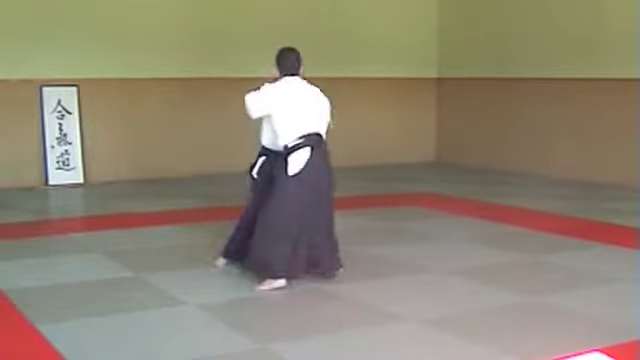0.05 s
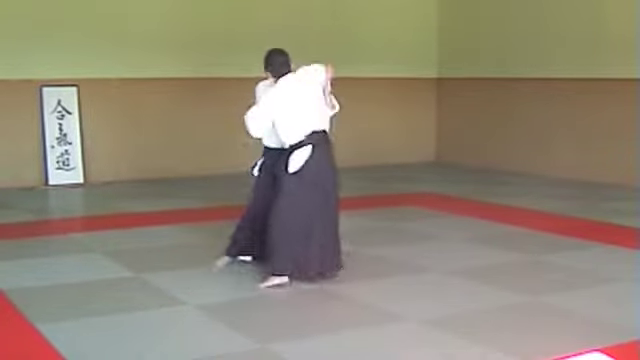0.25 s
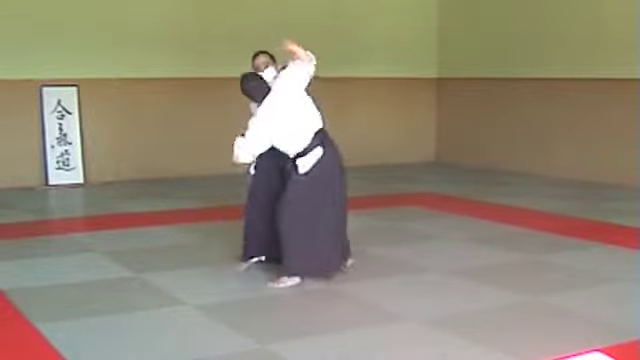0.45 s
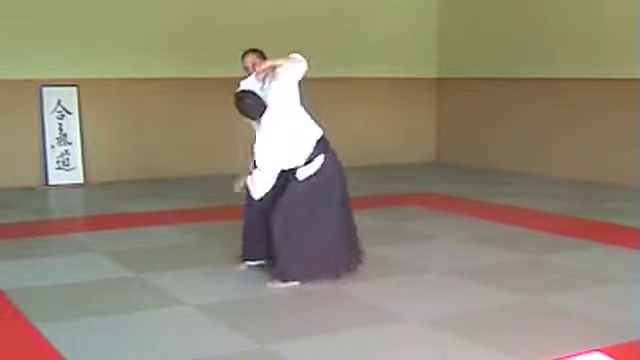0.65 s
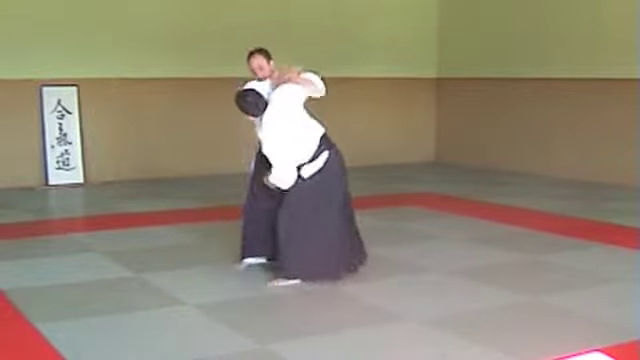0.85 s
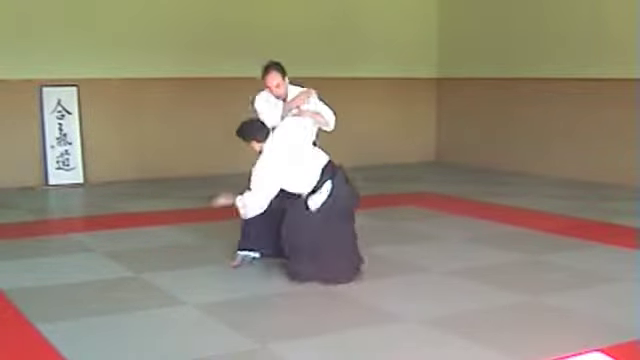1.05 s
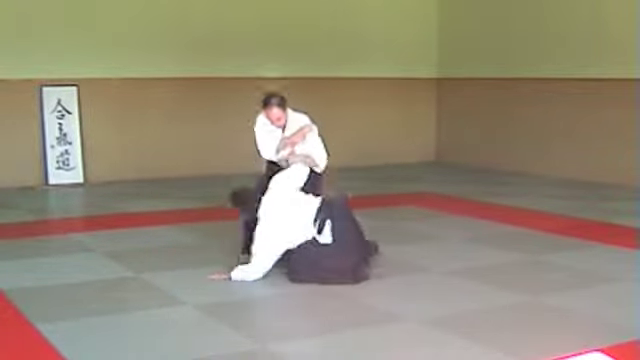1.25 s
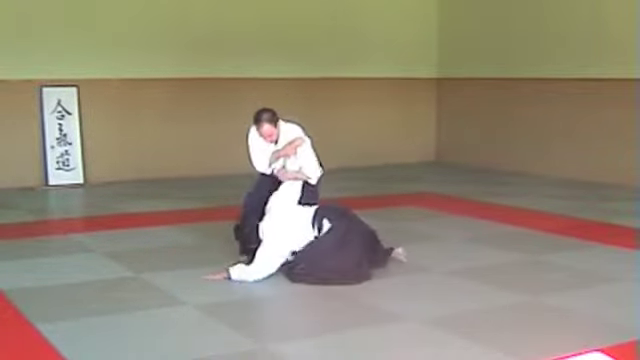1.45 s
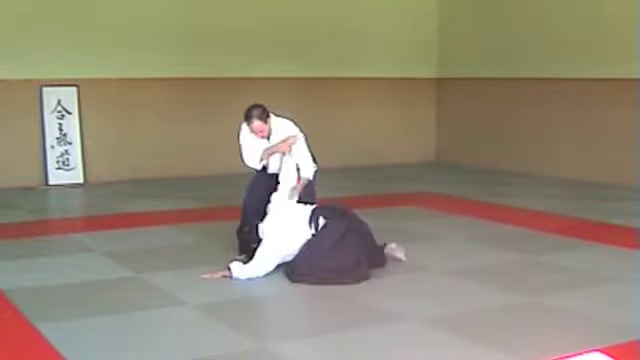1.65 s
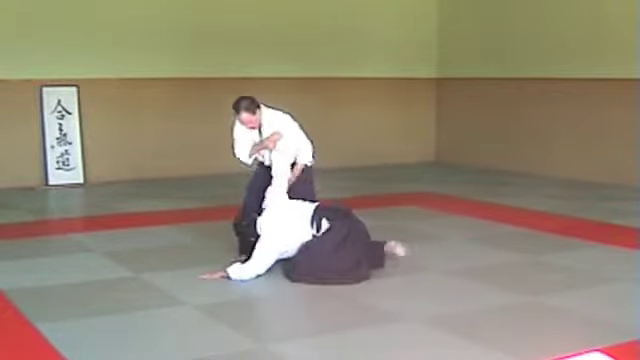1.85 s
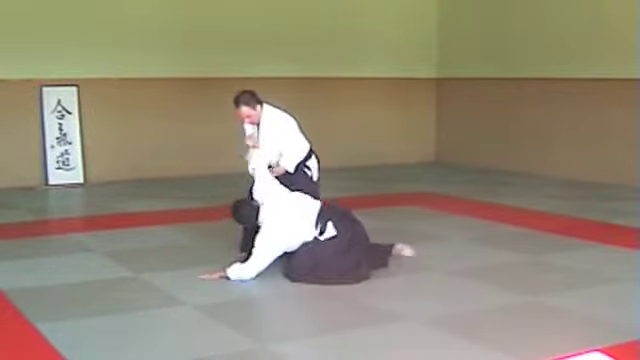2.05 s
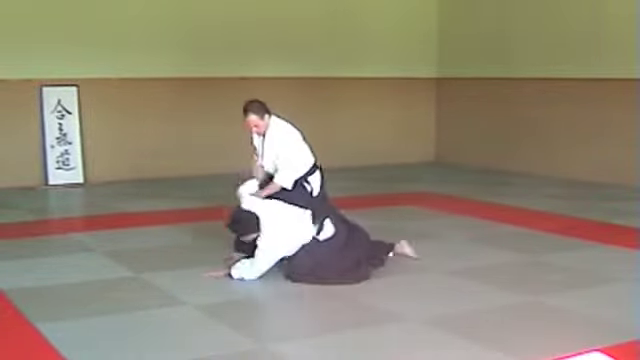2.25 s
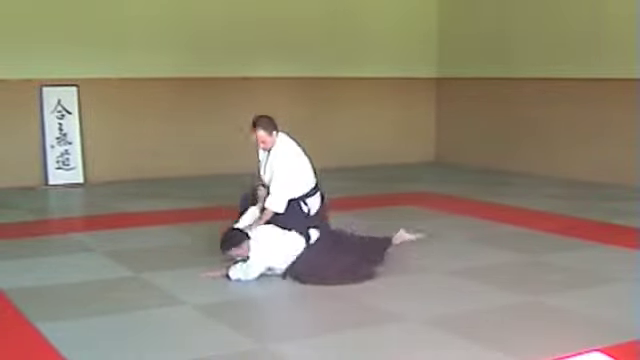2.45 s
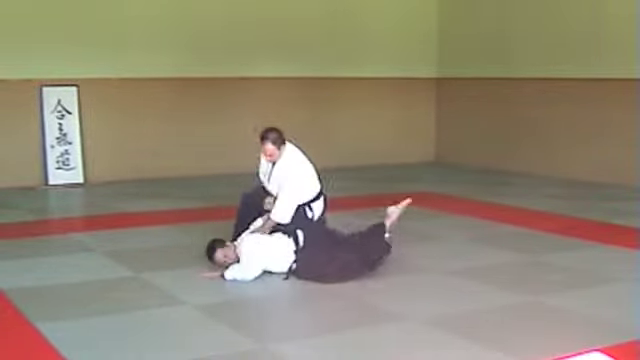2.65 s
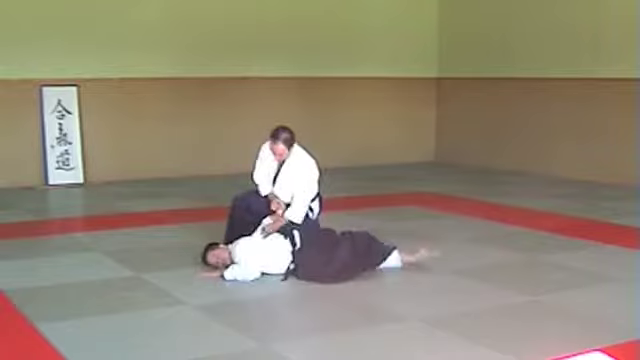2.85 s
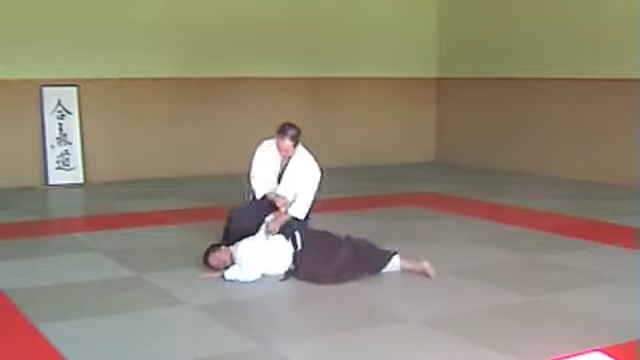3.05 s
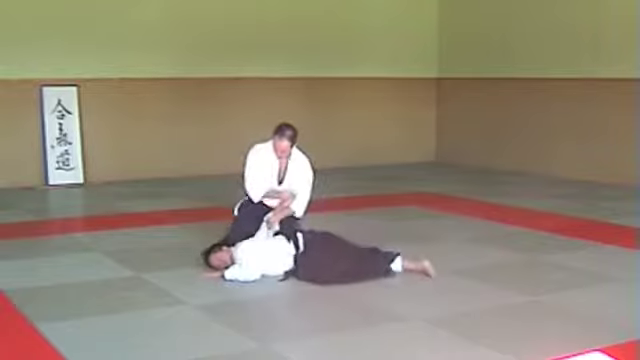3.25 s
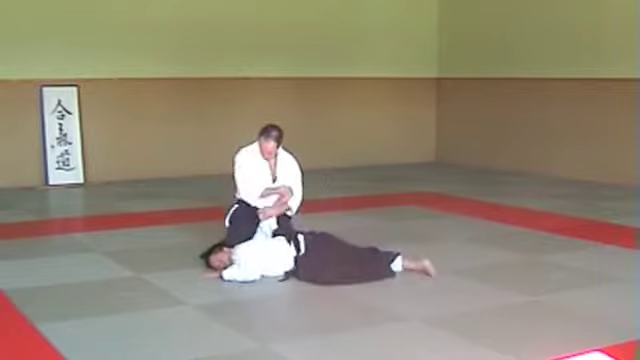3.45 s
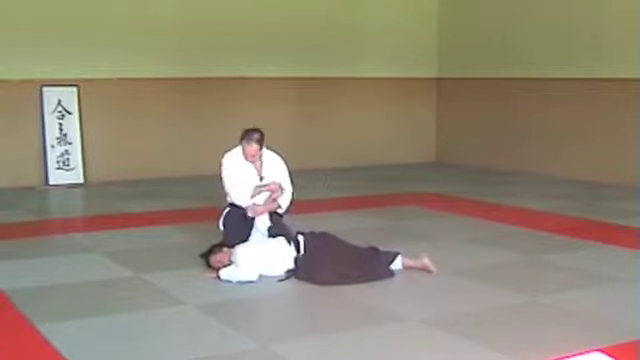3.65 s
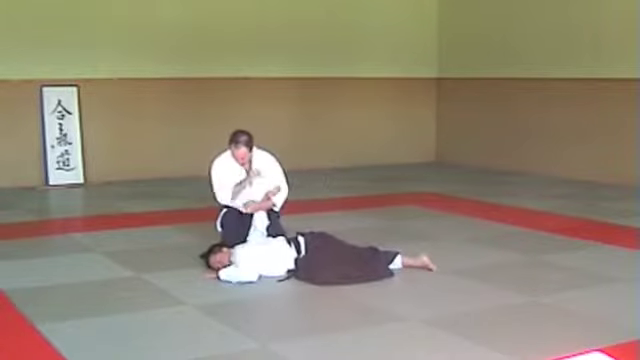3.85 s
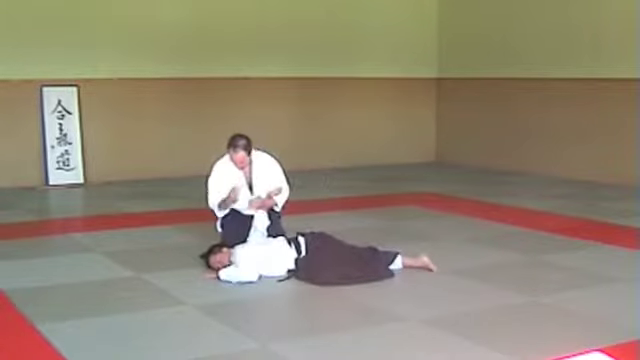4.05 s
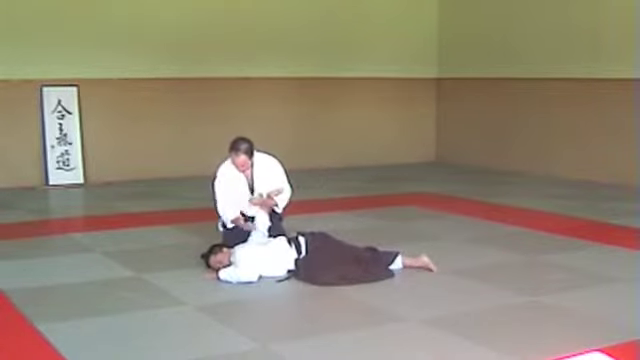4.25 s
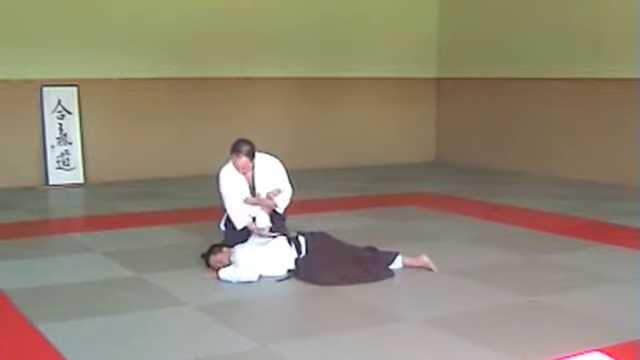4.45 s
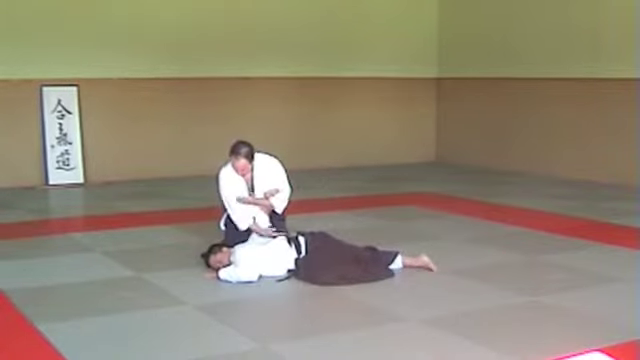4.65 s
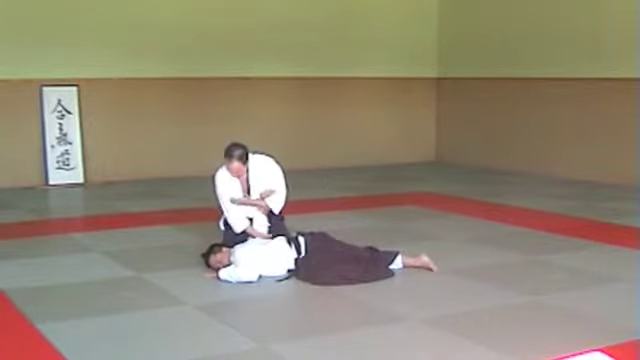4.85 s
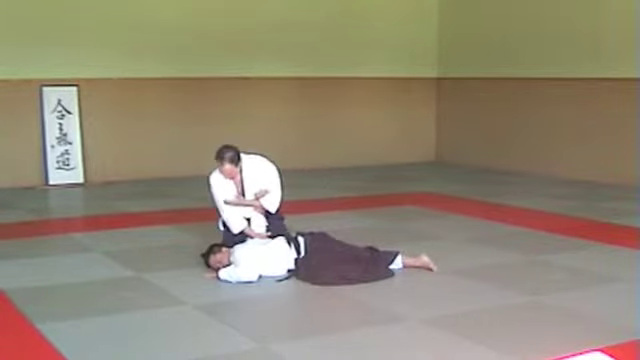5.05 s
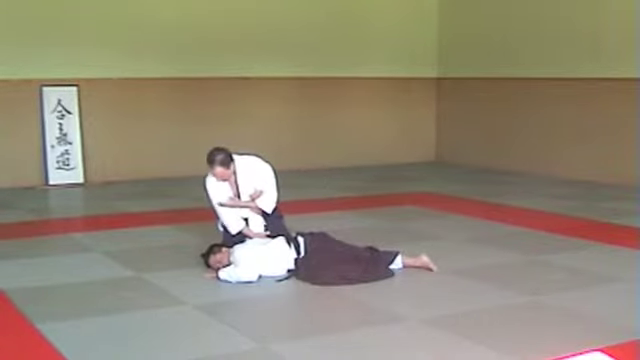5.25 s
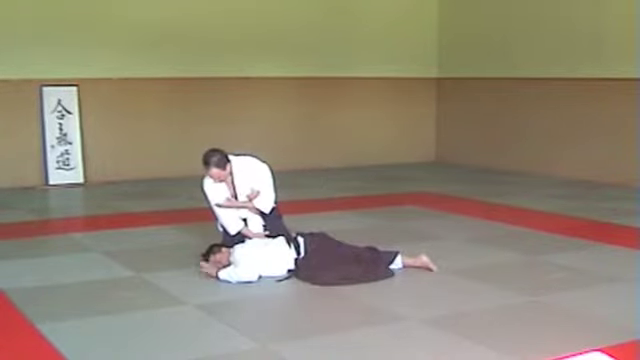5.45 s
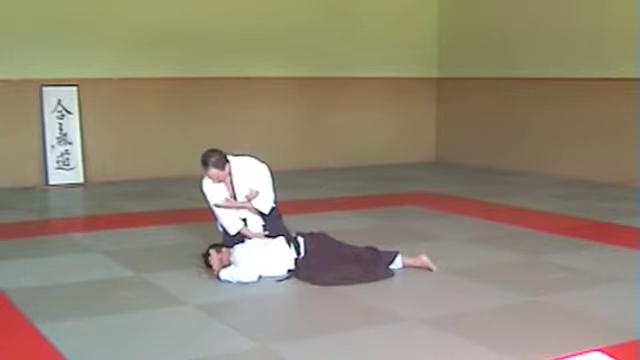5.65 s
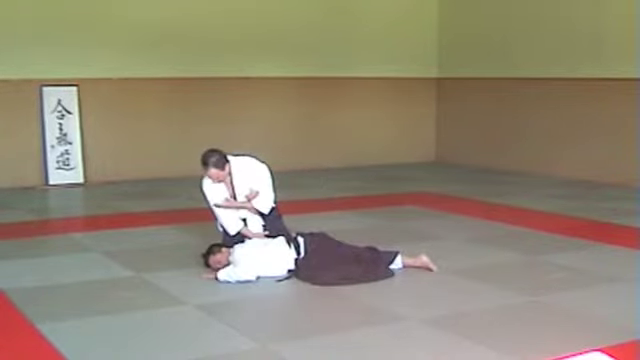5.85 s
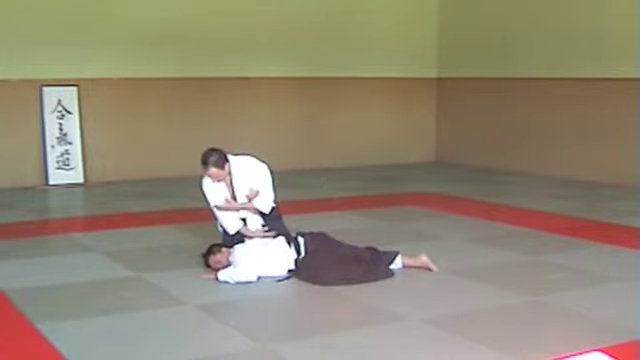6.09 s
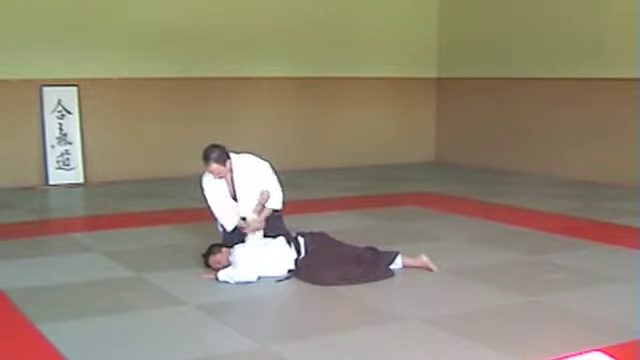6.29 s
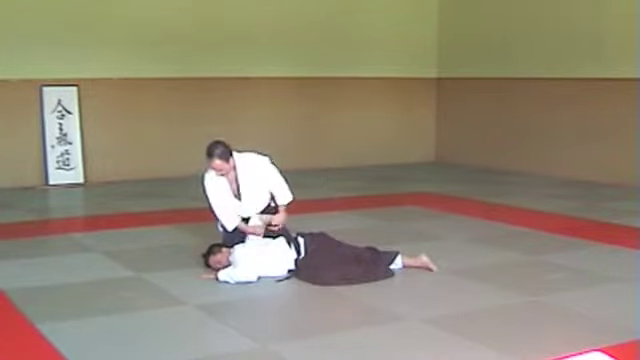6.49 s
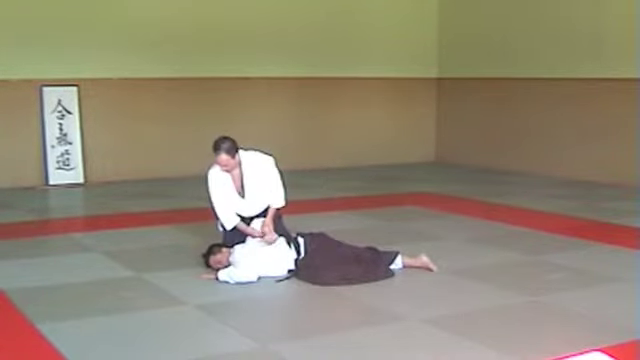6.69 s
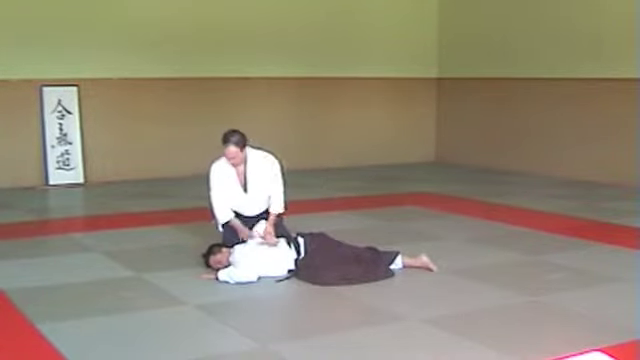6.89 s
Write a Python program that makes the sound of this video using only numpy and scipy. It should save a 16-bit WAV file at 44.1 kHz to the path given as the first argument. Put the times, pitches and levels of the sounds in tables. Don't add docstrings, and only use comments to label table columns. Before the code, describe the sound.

Two people grapple on foam mats: cotton rustle, dull knee thuds, three sharp slaps echoing boomily through a bare hall over ventilation noise.

```python
import sys
import numpy as np
from scipy import signal
from scipy.fft import rfft, irfft, next_fast_len
from scipy.io import wavfile
from scipy.ndimage import uniform_filter1d

SR = 44100
rng = np.random.default_rng(int(sys.argv[2]) if len(sys.argv) > 2 else 0)


def volts(x):
    e = np.asarray(x, float) / 20
    return 10 ** e


def file_out(sig):
    cols = np.atleast_2d(sig).T
    lim = np.clip(cols, -1, 1)
    pcm = np.round(lim * 32767).astype(np.int16)
    wavfile.write(sys.argv[1], SR, pcm)


N = 305172
SIZE = next_fast_len(N + 2 ** 17)
HZ = np.maximum(np.fft.rfftfreq(SIZE, 1 / SR), 1)

# frequency [Hz], level [dB per Hz].
AIR_COLOUR = [(12, -46), (20, -20), (107, -6.5), (422, -2.5), (485, -1.5), (802, -6.5), (1570, -12.5),
              (2020, -18), (2460, -20), (16000, -30.5)]
# frequency [Hz], side minus mid [dB].
WIDTH_ALL_ROUND = [(60, -5), (110, -7.5), (200, -5.5), (380, -9), (700, -6), (1290, -12.5), (2380, -8),
                   (4400, -6.5), (8120, 0), (12500, -0.5), (15000, -6)]
# fastest at [s], level [dB], brightness [dB],
# swell [s] and fade [s], both as times for 20 dB.
CLOTH_MOVES = [(.005, -53, -12, .05, 0.12), (.182, -45.5, 7, 0.23, 0.2), (.426, -53, -5, 0.045, 0.04),
               (0.476, -45, 7, 0.073, 0.25), (.772, -56.5, -2.5, 0.39, 0.089), (.93, -75, -4, 0.68, .3),
               (1.01, -54, 7.5, .02, 0.22), (1.064, -50, 12, 0.16, 0.077), (1.196, -54, -8.5, 0.33, 0.033),
               (1.309, -53.5, -15.5, 0.17, 0.016), (2.112, -56.5, -3.5, 0.34, .17),
               (2.224, -59.5, -11, .015, 0.41), (2.354, -54, -6, 0.25, 0.29),
               (2.618, -59.5, -10, 0.22, 0.68), (2.99, -64.5, -16, 0.088, .03), (3.3, -66, -16, 0.18, 0.93),
               (3.828, -63, -4, 0.83, 0.58), (4.17, -80, -8, 0.17, .15), (4.5, -85.5, -7.5, 0.79, 1.2),
               (5.05, -82.5, -7, .8, 1.2), (5.3, -80, -7, 0.77, .6), (5.92, -78.5, -6, 0.8, .05),
               (6.72, -73, -5, .05, .15), (6.852, -64.5, -7, 0.053, 0.21)]
# frequency [Hz], level [dB per Hz].
CLOTH_COLOUR = [(120, -3.5), (200, 5.5), (509, 3.5), (735, -1.5), (821, -6), (2330, -8), (5630, -15),
                (14300, -29.5), (16000, -65)]
# start [s], level [dB], mat resonance [Hz], its width [Hz], push [ms].
MAT_THUDS = [(0.039, -40, 200, 239, 4.2), (0.168, -38, 266, 300, 5.1), (0.471, -50, 300, 400, 1.8),
             (.485, -43.5, 2270, 300, 24), (0.629, -40, 340, 507, 2.7), (0.999, -44, 300, 403, 2.36),
             (1.14, -38, 200, 403, 4.7), (1.21, -37, 121, 200, 4.9), (1.277, -32, 1000, 150, 18),
             (1.297, -27, 350, 493, 3.5), (1.331, -28, 900, 350, 3.3), (2.23, -41.5, 390, 706, 2.3),
             (2.478, -38.5, 128, 254, 5.9), (2.659, -42.5, 846, 900, 10.6), (3.006, -28, 390, 600, 4.8),
             (3.031, -40, 40, 40, 6.7), (3.419, -43.5, 60, 100, 5.1), (3.818, -41.5, 487, 595, 8.9),
             (4.05, -44.5, 950, 300, 60), (4.298, -51.5, 500, 600, 10), (5.051, -53.5, 906, 1220, 9.2),
             (5.2905, -42.5, 310, 100, 2.3), (5.291, -44, 450, 200, 2)]
# start [s], level [dB], centre [Hz].
CLOTH_SNAPS = [(.417, -55, 8000), (0.5857, -60, 8900), (1.003, -54.5, 5010), (2.227, -64, 9000),
               (2.231, -46, 3270), (3.0143, -42, 3000), (3.0169, -34, 2500), (3.0147, -45, 3500),
               (3.0235, -38, 5040), (3.204, -51, 8000), (3.2555, -58, 5100)]
# delay [ms], bass [dB], treble [dB], left minus right [dB].
WALL_ECHOES = [(5.558, -0.5, -3.5, 15.5), (11.46, 4, -5, -18), (17.96, -7, -46, -16.5),
               (23.8, -23.5, -31, -12), (29.1, -23, -52.5, -1), (40., -10, -20, 2), (50.5, -1, -44, 3),
               (61.1, -16.5, -29, -21)]
# frequency [Hz], decay by 60 dB [s], build-up [ms], straight path against tail [dB].
HALL_BANDS = [(30.4, 1.9, 17, -9), (72.5, 0.31, 50, -26), (100, 1.06, 31, -7.5), (124.4, 1.95, 18, -18),
              (200, 1.1, 61, -8), (300, 2.36, 3.9, -10), (450, 1.86, 4.3, -10.5), (1000, 1.145, 15, -10),
              (2500, 1.61, 2.2, -11.5), (4280, 1.46, 13, -6.5), (8000, 0.9, 30, -0.5),
              (15200, 0.54, 7.3, 1)]
# start [s], level [dB], spread of the contact [ms], lag of the foam [ms].
MAT_SLAPS = [
    (1.3278, -7.5, 1.5, 0.94),
    (3.0210, -18.5, 0.42, 1.25),
    (5.9295, -10.5, .5, 1.93),
]
# frequency [Hz], level [dB per Hz].
PALM_COLOUR = [(18, -74), (30, -26.5), (194, -4.5), (280, -2.5), (404, -13), (449, -13.5), (740, -23),
               (1160, -29), (1280, -29), (1720, -25), (2290, -30.5), (4420, -30.5), (13700, -49),
               (14800, -53), (16000, -81)]
FOOT_COLOUR = [(18, -25), (30, 1), (49, 3), (81, -8.5), (118, -2), (227, 1.5), (437, -8), (512, -4),
               (569, -8), (684, -9), (1430, -16.5), (3140, -15), (8520, -34), (13700, -45), (16000, -69)]
PALM_AGAIN_COLOUR = [(18, -53), (30, -24), (103, -17), (157, -0.5), (266, -1), (415, -9.5), (461, -19),
                     (616, -17), (702, -24.5), (1040, -22.5), (2830, -29), (3220, -30), (6210, -33.5),
                     (14000, -52.5), (16000, -63)]
# extra level [dB], centre [Hz], width [Hz].
CRACK_BEAMS = [
    (3.5, 4300, 1600),
    (3, 3900, 23000),
    (0, 3000, 1500),
]
# frequency [Hz], width [Hz], boost [dB].
AIR_POCKETS = [
    [(950, 260, 9), (2300, 400, -0.5), (2950, 340, 5.5), (4340, 590, 5), (5250, 360, 5)],
    [(544, 55, 6.5), (1650, 300, -6), (1910, 180, 6), (3180, 340, 0.5)],
    [(1000, 380, 5.5), (1430, 490, -3), (2340, 480, 3.5)],
]
# frequency [Hz], side minus
# mid [dB].
WIDTH_OF_BLOWS = [(60, -47), (110, -77), (200, -52), (380, -36.5), (700, -20.5), (1290, -22), (2380, -10.5),
                  (4400, -6.5), (8120, 1.5), (12000, 1), (15000, -8.5)]
# start [s], end [s], frequency [Hz], level [dB].
BEAM_HUMS = [(3.76, 4.05, 709, -53.5), (4.2, 4.5, 709, -57.5), (5.35, 5.98, 208, -58)]
# frequency [Hz], left minus right [dB].
CAPSULE_BALANCE = [(30, 19), (60, -4.5), (200, 0.5), (700, -0.7), (4000, -1), (12000, 0)]


def on_log(table, hz, column=1):
    rows = np.array(table, float)
    return np.interp(np.log(hz), np.log(rows[:, 0]), rows[:, column])


def unit(x):
    return x / np.sqrt(np.sum(x ** 2))


def add(track, s, sound):
    i = int(s * SR)
    track[i:i + len(sound)] += sound[:len(track) - i]


def noise(db):
    x = irfft(rfft(rng.standard_normal(SIZE)) * volts(db), SIZE)[:N]
    return x / np.std(x)


def causal_log(log_gain):
    cepstrum = irfft(log_gain)
    cepstrum[1:len(cepstrum) // 2] *= 2
    cepstrum[len(cepstrum) // 2 + 1:] = 0
    return rfft(cepstrum)


def causal(db_at, size=8192):
    hz = np.maximum(np.fft.rfftfreq(size, 1 / SR), 1)
    return unit(irfft(np.exp(causal_log(np.log(volts(db_at(hz)))))))


def ragged(spread_ms, size=8192):
    t_ms = np.arange(size) / SR * 1000
    burst = rfft(rng.standard_normal(size) * t_ms * np.exp(-2 * t_ms / spread_ms))
    return irfft(burst / np.exp(causal_log(np.log(np.abs(burst)))))


def air():
    air_db, hiss_side_db = -55, -93
    slow = uniform_filter1d(rng.standard_normal(N), size=9000)
    wander = volts(unit(slow) * np.sqrt(N))
    colour = on_log(AIR_COLOUR, HZ)
    mid = volts(air_db) * wander * noise(colour)
    side = volts(air_db - 5) * noise(colour + on_log(WIDTH_ALL_ROUND, HZ))
    side += volts(hiss_side_db) * noise(-3 * np.log2(1 + 2000 / HZ))
    return np.array([mid + side, mid - side])


def swish():
    dull_slope_cut = 0.45
    t = np.arange(N) / SR
    crisp_power, dull_power = 0, 0
    for s, db, bright_db, swell_s, fade_s in CLOTH_MOVES:
        slower_db = -20 * np.where(t < s, (s - t) / swell_s, (t - s) / fade_s)
        crisp_power = crisp_power + volts(db + slower_db) ** 2
        dull_db = db - bright_db + (1.5 - dull_slope_cut) * slower_db
        dull_power = dull_power + volts(dull_db) ** 2
    grains = volts(3 * uniform_filter1d(rng.standard_normal(N), size=40) * np.sqrt(40))
    low_share = 1 / (1 + (HZ / 3000) ** 2)
    colour = on_log(CLOTH_COLOUR, HZ)
    dull = noise(colour + 10 * np.log10(low_share))
    crisp = noise(colour + 10 * np.log10(1 - low_share))
    return grains * (volts(4) * np.sqrt(dull_power) * dull + volts(3) * np.sqrt(crisp_power) * crisp)


def thuds():
    out = np.zeros(N)
    snaps = [(s, db, hz, hz, 0.1) for s, db, hz in CLOTH_SNAPS]
    for s, db, hz, width_hz, push_ms in MAT_THUDS + snaps:
        def colour(f):
            resonance_db = -10 * np.log10(1 + ((f - hz ** 2 / f) / width_hz) ** 2)
            return resonance_db - 14 * np.log2(1 + f / hz / 3)
        add(out, s, volts(db + 28) * signal.fftconvolve(causal(colour), ragged(push_ms)))
    return out


def hall_tail():
    lumpy_db, lumpy_s = 2, 0.21
    size = 2 ** 17
    t = np.arange(size) / SR
    hz = np.maximum(np.fft.rfftfreq(size, 1 / SR), 1)
    lumps = uniform_filter1d(rng.standard_normal(size), size=150) * np.sqrt(150)
    lumpy = volts(lumpy_db * lumps * np.exp(-t / lumpy_s))
    seeds = rfft(rng.standard_normal((2, size)) * lumpy)
    tail = np.zeros((2, size))
    for centre in 20 * 2 ** (np.arange(20) / 2):
        band = np.cos(np.pi / 2 * np.clip(2 * np.log2(hz / centre), -1, 1)) ** 2
        build_up = 1 - np.exp(-(t * 1000 / on_log(HALL_BANDS, centre, column=2)) ** 2)
        shape = build_up * volts(-60 * t / on_log(HALL_BANDS, centre))
        early = np.sqrt(np.sum(shape[:SR // 4] ** 2))
        tail += irfft(seeds * band) * shape / early
    return rfft(tail, SIZE)


def wall_echoes():
    scatter_db, scatter_ms, wall_top_hz = 1, 28, 7000
    bass_taps, treble_taps = np.zeros(SR), np.zeros((2, SR))
    for ms, bass_db, treble_db, pan_db in WALL_ECHOES:
        bass_taps[int(ms * SR / 1000)] = volts(bass_db)
        scattered = ragged(0.72)
        add(treble_taps[0], ms / 1000, volts(treble_db + pan_db / 2) * scattered)
        add(treble_taps[1], ms / 1000, volts(treble_db - pan_db / 2) * scattered)
    fading = np.exp(-np.arange(SR) / SR * 1000 / scatter_ms)
    scatter = rng.standard_normal(SR) + 0.46 * rng.standard_normal((2, SR))
    treble_taps += volts(scatter_db) * unit(fading * scatter)
    treble = 1j * HZ / (1500 + 1j * HZ)
    bass_part = rfft(bass_taps, SIZE) * (1 - treble)
    return bass_part + rfft(treble_taps, SIZE) * treble / (1 + 1j * HZ / wall_top_hz)


def hall():
    straight_db = on_log(HALL_BANDS, HZ, column=3)
    straight = np.exp(causal_log(np.log(volts(straight_db))))
    return straight, wall_echoes(), hall_tail()


def slaps():
    plain, beamed = np.zeros(N), np.zeros(N)
    colours = (PALM_COLOUR, FOOT_COLOUR, PALM_AGAIN_COLOUR)
    for slap, crack_beam, pockets, colour in zip(MAT_SLAPS, CRACK_BEAMS, AIR_POCKETS, colours):
        s, db, spread_ms, lag_ms = slap
        beam_db, beam_hz, width_hz = crack_beam

        def blow_db(hz):
            ringing = sum(g / (1 + (2 * (hz - f) / w) ** 2) for f, w, g in pockets)
            return on_log(colour, hz) + ringing
        blow = rfft(causal(blow_db))
        hz = np.linspace(0, SR / 2, len(blow))
        late_bass = np.exp(-2j * np.pi * lag_ms / 1000 * 900 * np.arctan(hz / 900))
        smear = np.angle(rfft(ragged(spread_ms)))
        skin = np.exp(1j * np.unwrap(smear - smear[0]) * hz ** 2 / (hz ** 2 + 700 ** 2))
        beam = volts(beam_db) * 1j * hz * width_hz / (beam_hz ** 2 - hz ** 2 + 1j * hz * width_hz)
        struck = blow * late_bass * skin
        add(plain, s, volts(db + 30) * irfft(struck))
        add(beamed, s, volts(db + 30) * irfft(struck * beam))
    return np.array([plain, beamed])


def hums():
    t = np.arange(N) / SR
    slow = uniform_filter1d(rng.standard_normal(N), size=3000)
    waver = volts(0.6 * unit(slow) * np.sqrt(N))
    tones = np.zeros(N)
    for start, end, hz, db in BEAM_HUMS:
        progress = np.clip((t - start) / (end - start), 0, 1)
        swell = np.sqrt(np.sin(np.pi * progress).clip(0))
        tones += volts(db) * swell * np.sin(2 * np.pi * hz * t)
    return waver * tones


def scene():
    straight, echoes, (mid, side) = hall()
    hard, beamed = rfft(slaps(), SIZE)
    soft, cloth = rfft(thuds(), SIZE), rfft(swish(), SIZE)
    diffuse = soft + volts(-2) * cloth / (1 + 1j * HZ / 6000)
    hard_side = hard * volts(on_log(WIDTH_OF_BLOWS, HZ))
    side = side * (hard_side + diffuse * volts(on_log(WIDTH_ALL_ROUND, HZ)))
    near = straight * ((hard + soft + cloth) * (1 + echoes) + beamed)
    heard = near + (hard + diffuse) * mid + np.array([side, -side])
    balance = volts(np.outer([0.5, -0.5], on_log(CAPSULE_BALANCE, HZ)))
    return irfft(heard * balance, SIZE)[:, :N] + hums() + air()


def roll_off(x):
    return signal.sosfilt(signal.butter(12, 16820, fs=SR, output="sos"), x)


def record(dry):
    rounded = np.tanh(0.85 * dry) / 0.85
    low_pass = signal.ellip(10, 0.2, 70, 15600, fs=SR, output="sos")
    mix = signal.sosfilt(low_pass, rounded)
    return roll_off(mix)


dry = scene()
out = record(dry)
file_out(out)
```